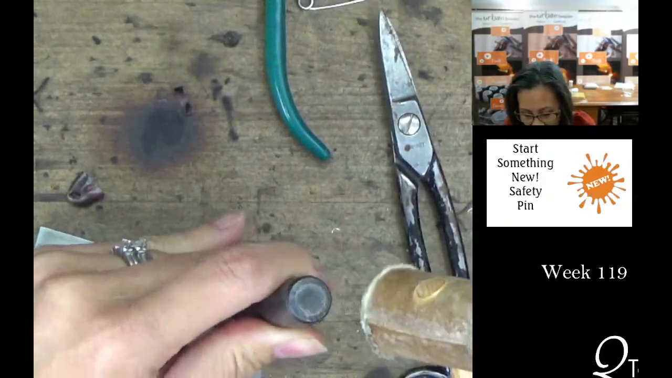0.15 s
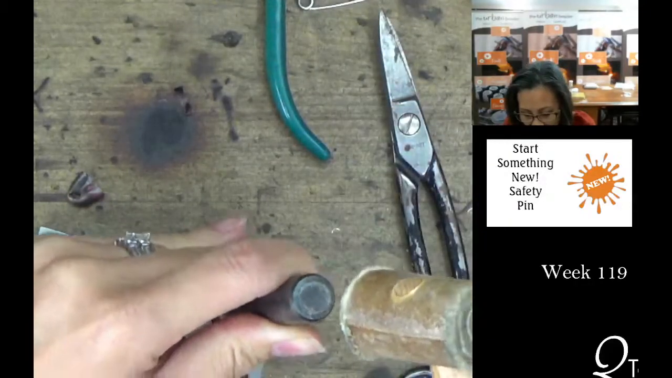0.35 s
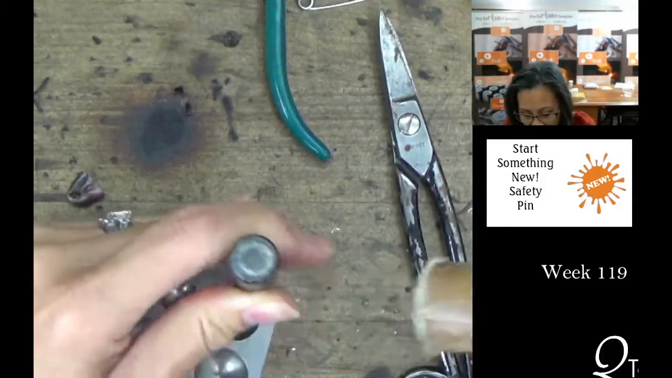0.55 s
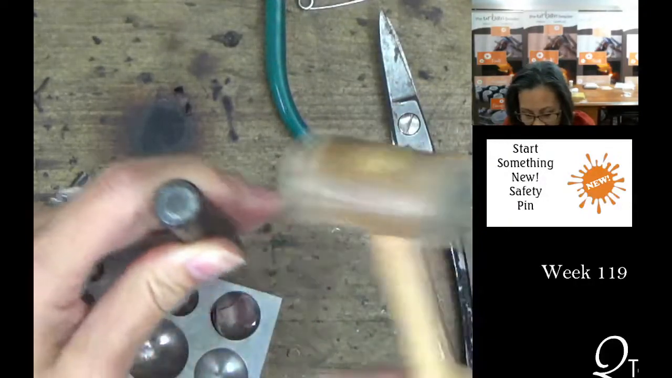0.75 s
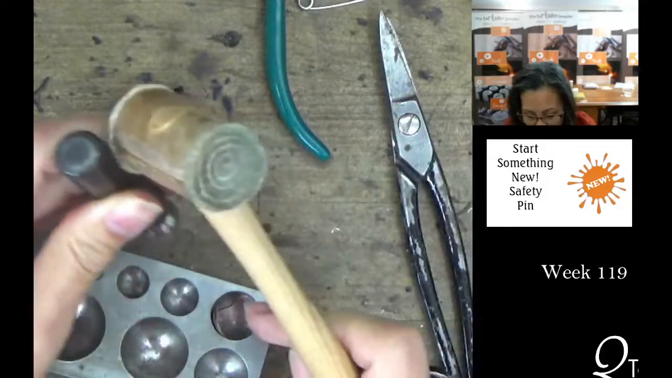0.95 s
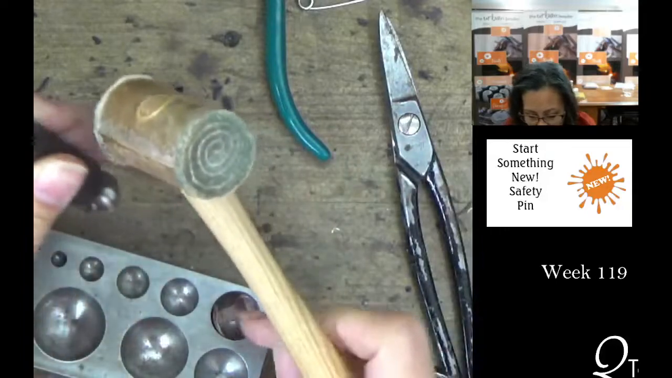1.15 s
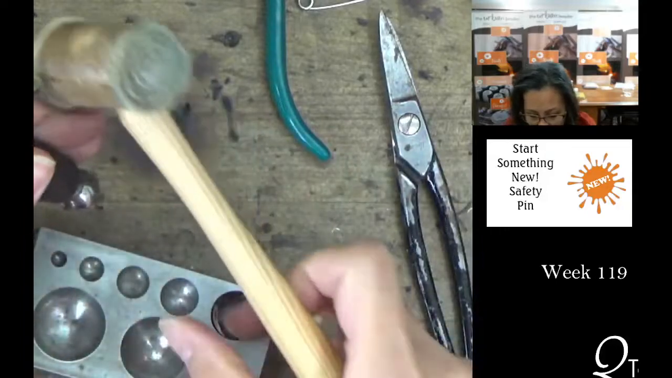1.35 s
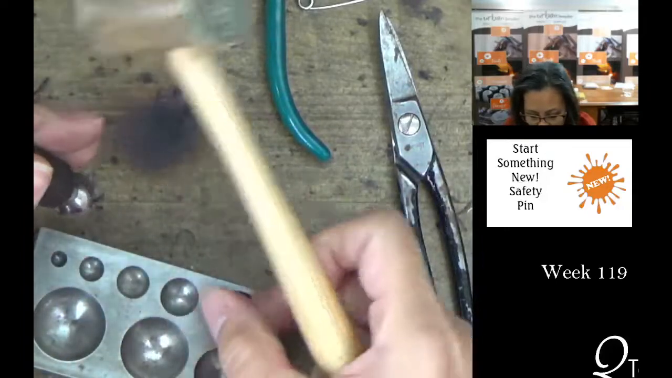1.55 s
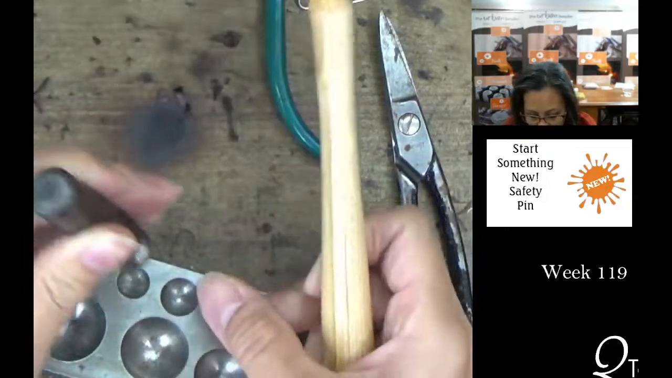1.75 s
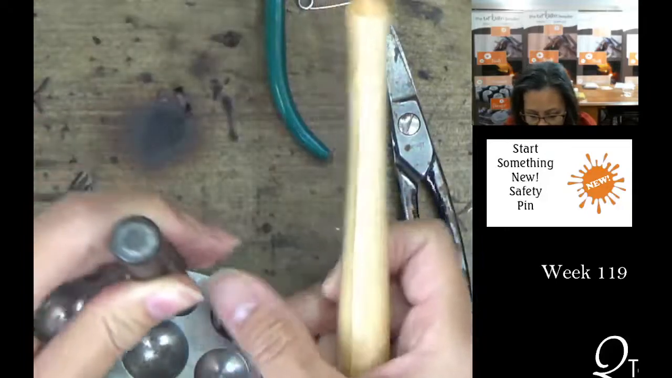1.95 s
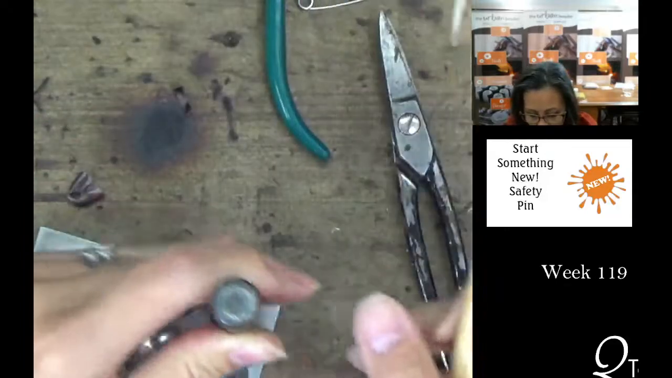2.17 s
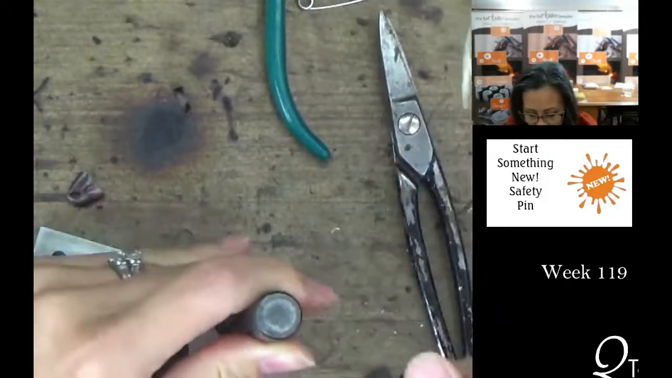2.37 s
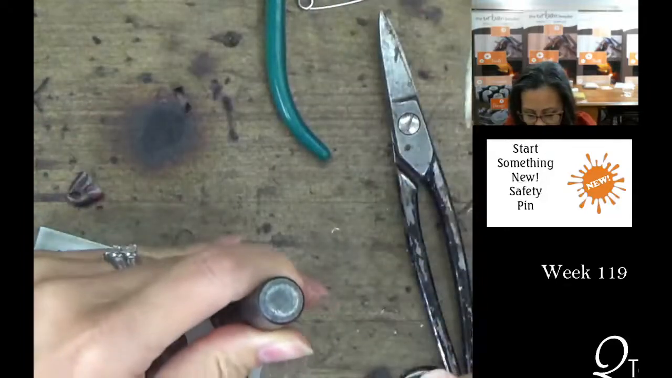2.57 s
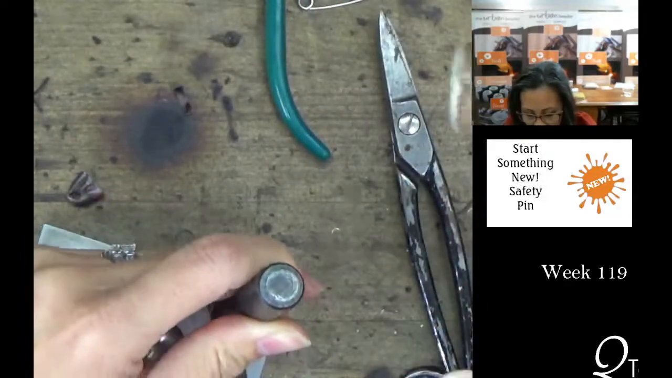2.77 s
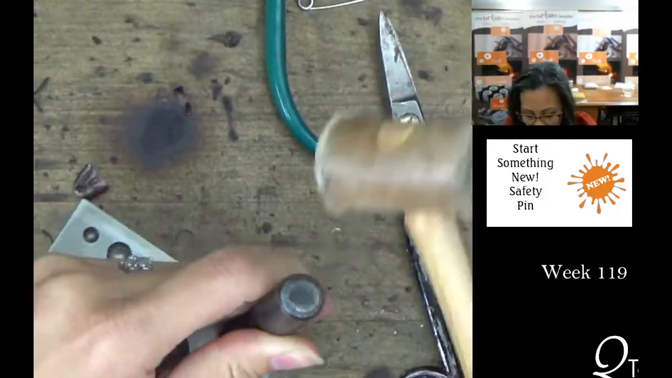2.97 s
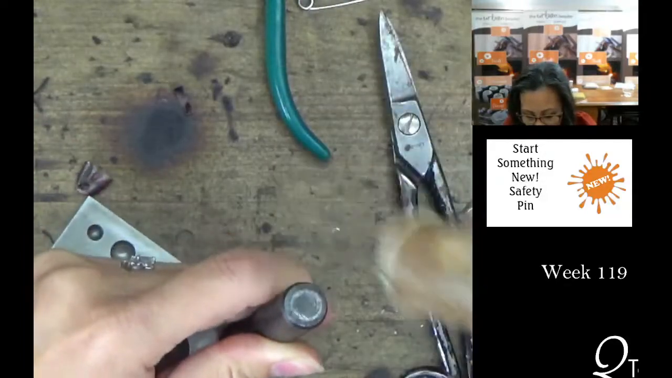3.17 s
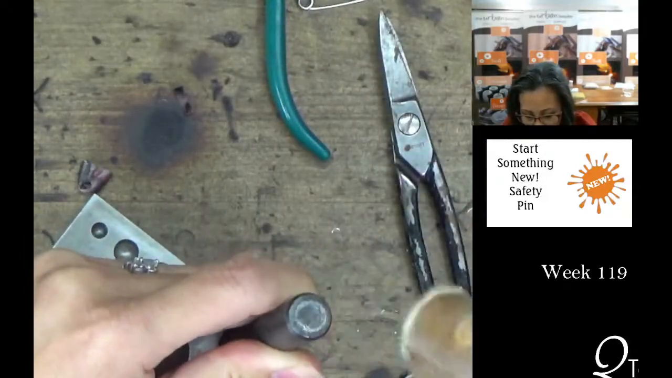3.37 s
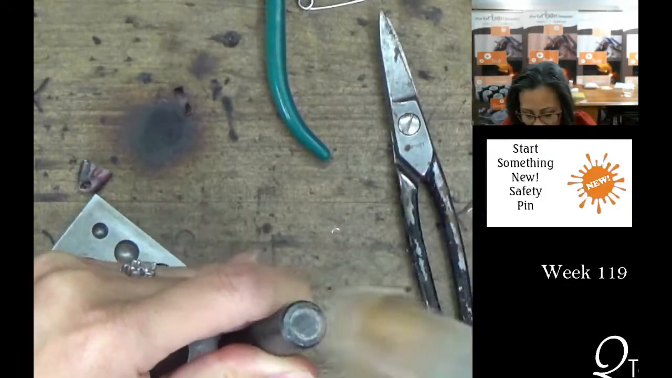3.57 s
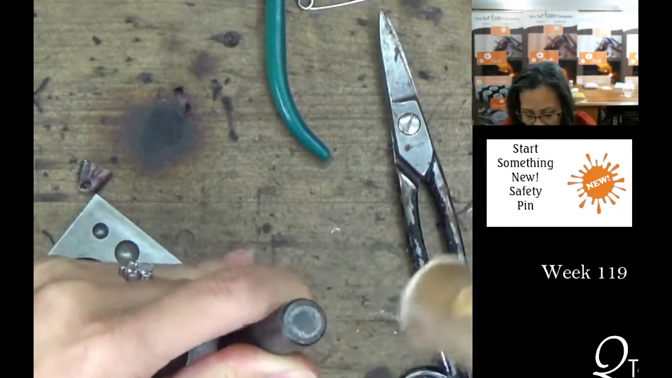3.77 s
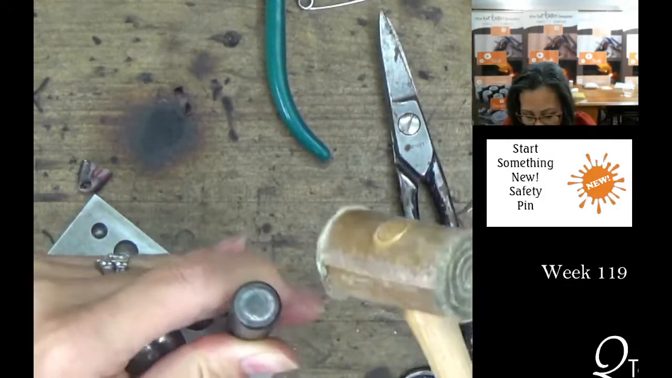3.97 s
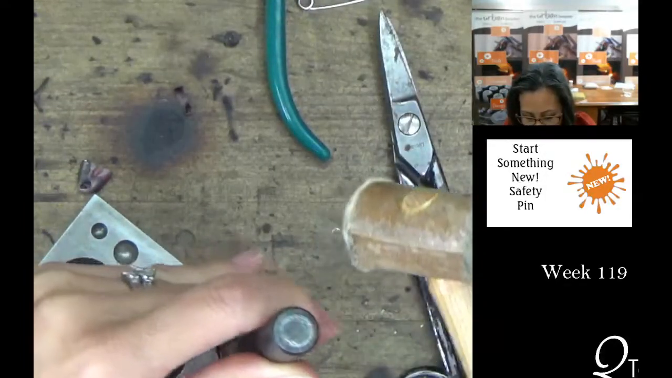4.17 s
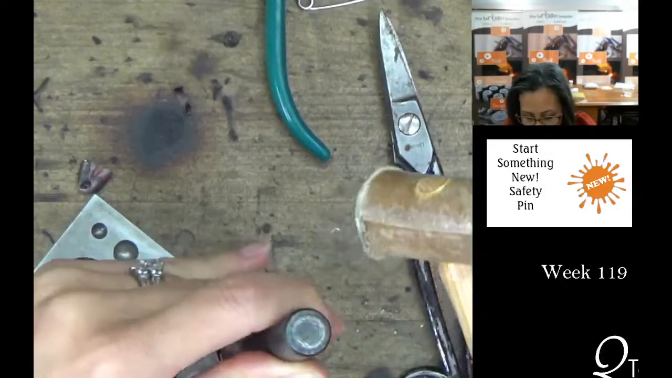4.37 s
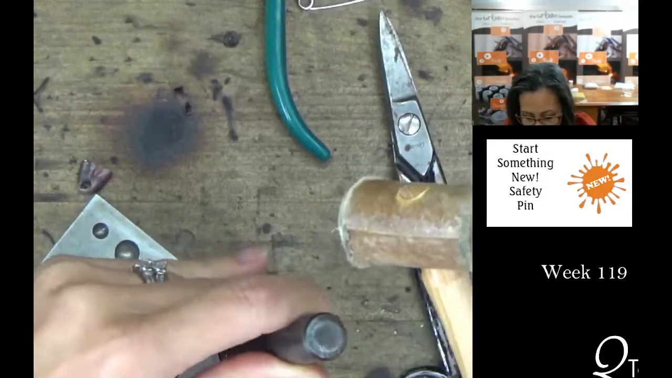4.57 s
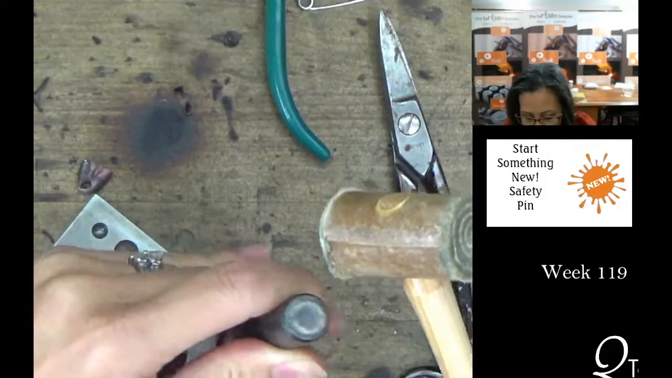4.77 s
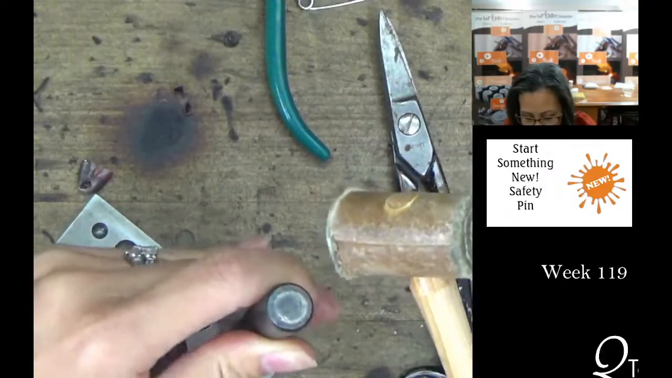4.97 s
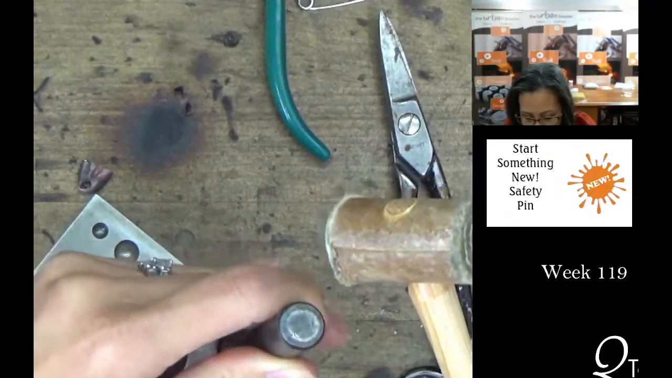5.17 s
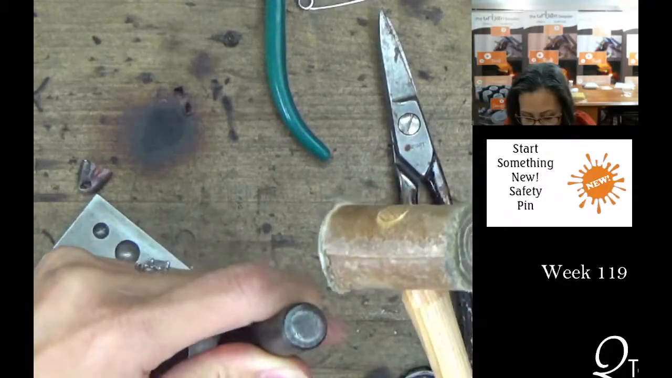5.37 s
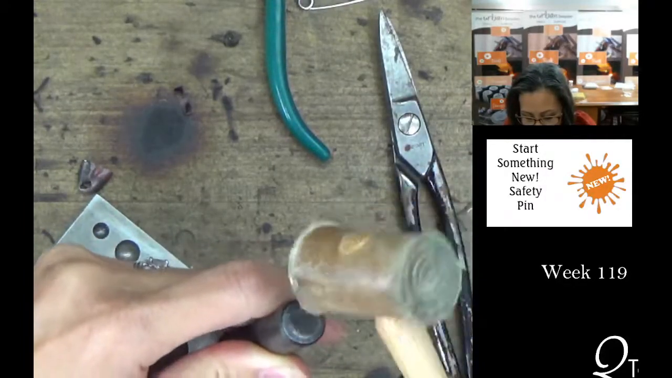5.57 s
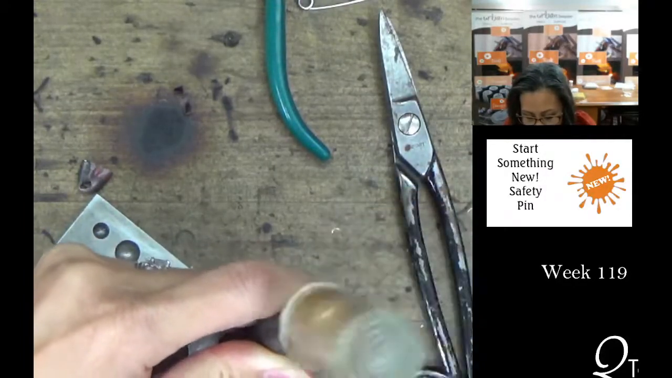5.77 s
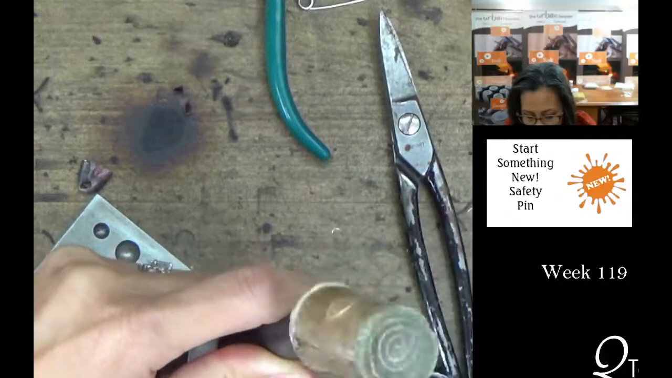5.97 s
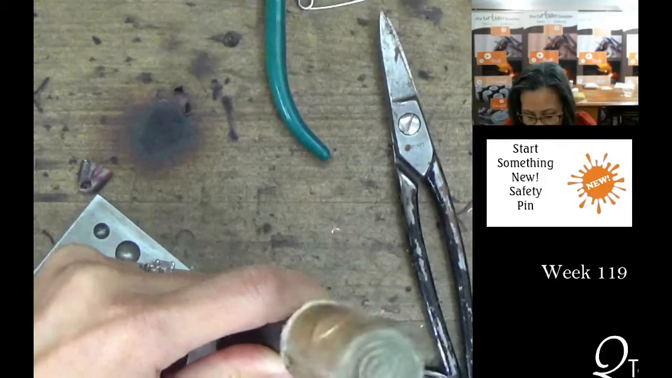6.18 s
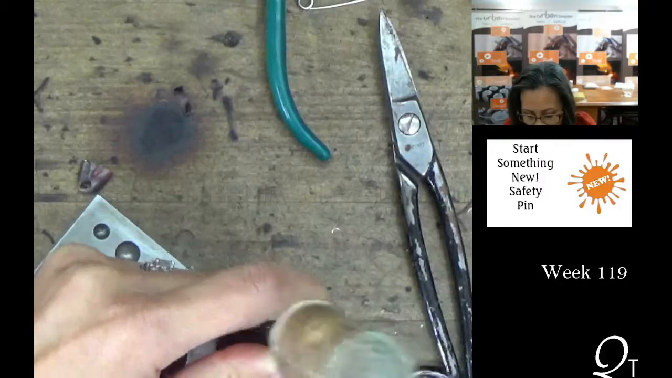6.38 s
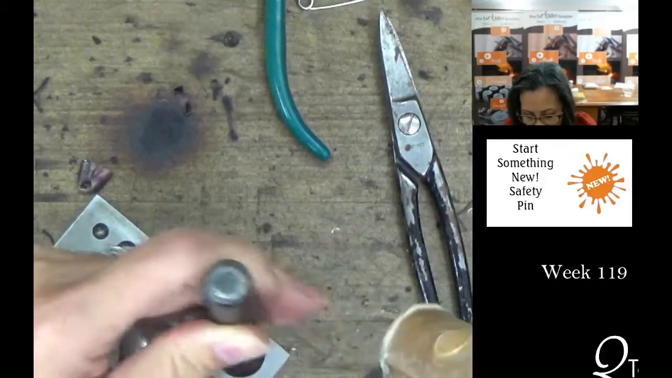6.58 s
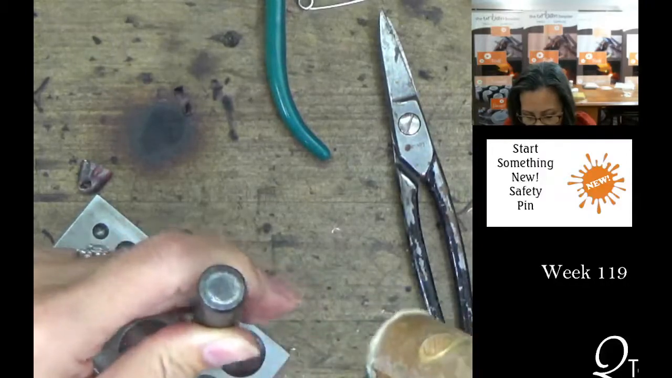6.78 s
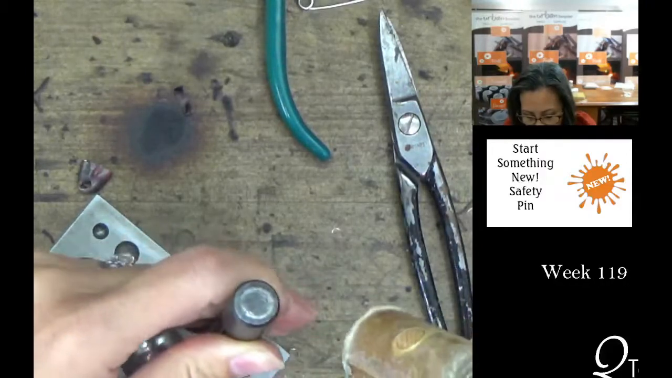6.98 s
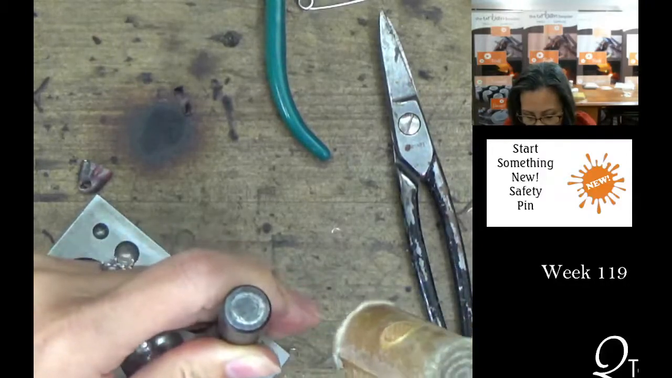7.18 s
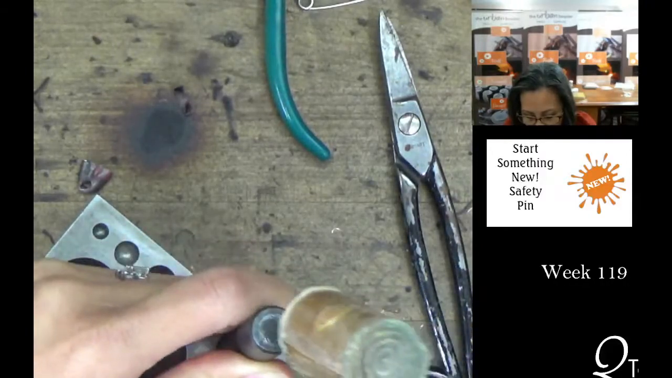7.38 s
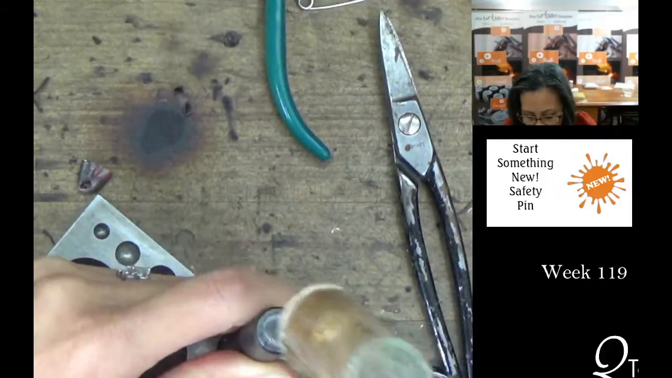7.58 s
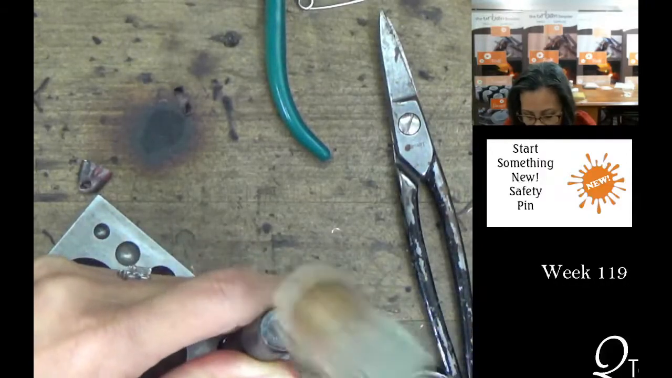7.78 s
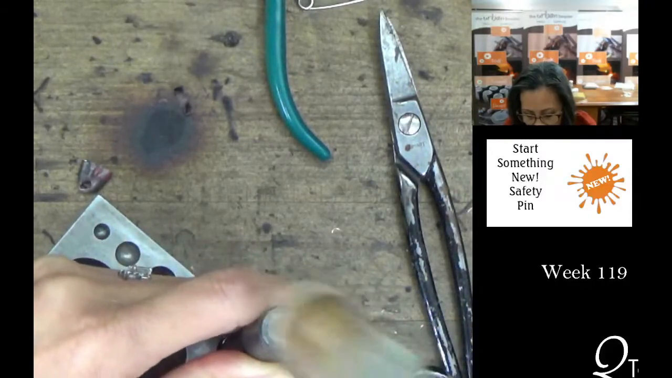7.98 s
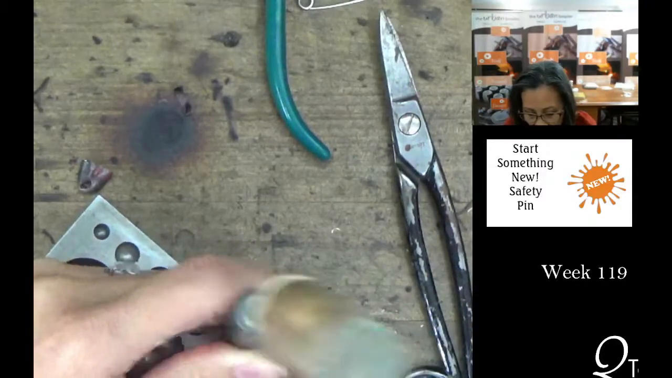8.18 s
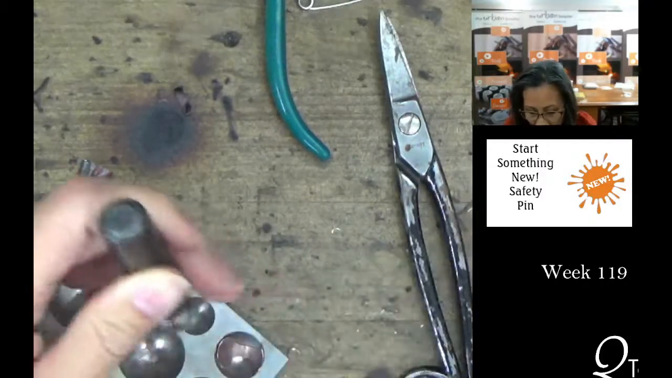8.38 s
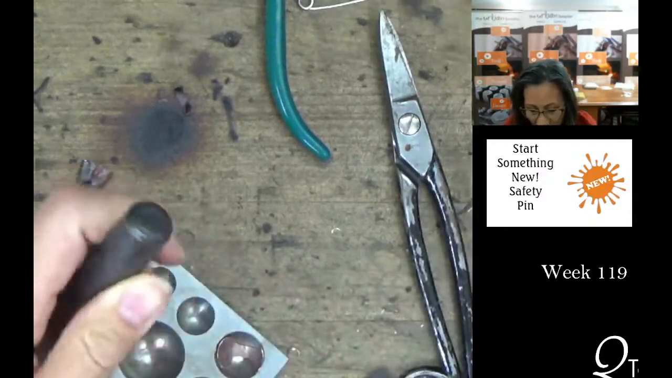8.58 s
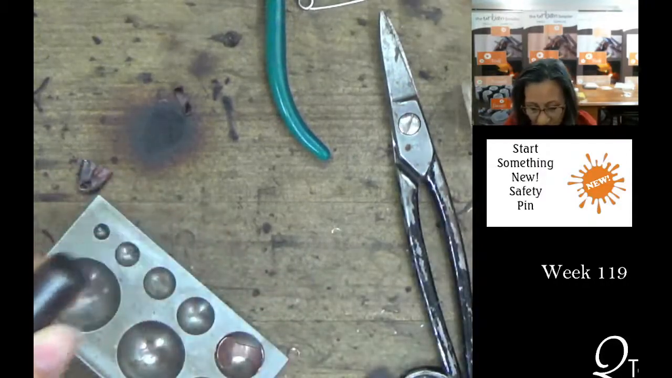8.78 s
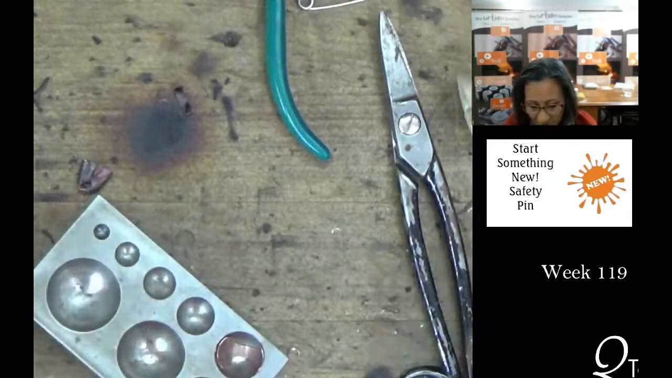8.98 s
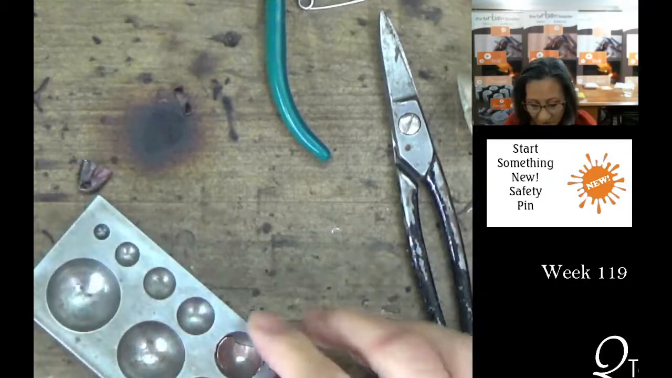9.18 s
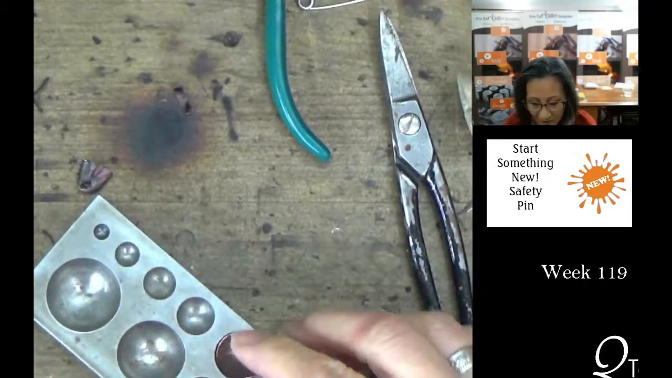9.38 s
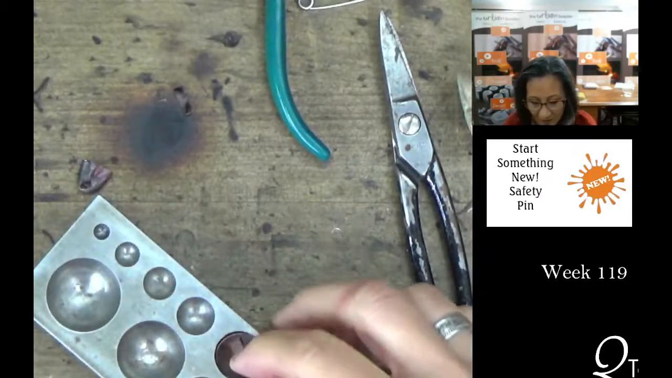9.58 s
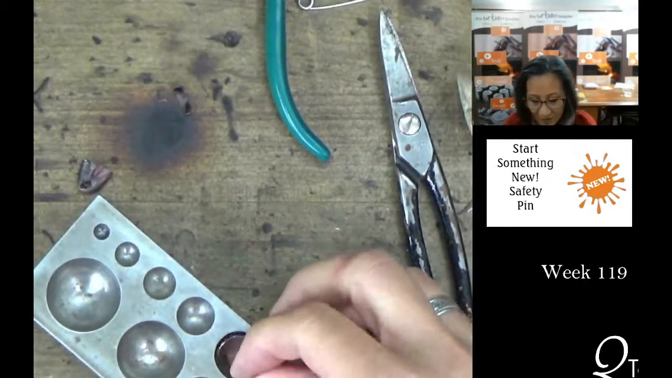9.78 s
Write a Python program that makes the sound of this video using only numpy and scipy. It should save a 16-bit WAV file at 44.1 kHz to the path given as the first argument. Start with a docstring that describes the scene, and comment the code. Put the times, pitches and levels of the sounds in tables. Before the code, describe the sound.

Close by at a wooden bench in a small room, a rawhide mallet hits a steel punch in a metal block: three growing blows, then four, then three slanted ones with a thin steel ring. Soft thuds, tiny disc ticks and brief rubs fill the gaps. Punch and mallet are then set down with woody clacks. Faint mains buzz and room noise run throughout.

```python
"""A rawhide mallet drives a steel dapping punch into a doming block: three quick groups of modal, crushed
blows. Place: a metal bench in a small room; its modes, dense short modes and reverberation answer every
contact. Between groups, soft reseating knocks, thin steel rings, disc ticks and rubs; then punch and mallet are
laid down. Behind them, loose tools sing on as narrow bands, over coloured room noise and a faint harmonic mains
buzz. Microphone: close by, thin in the deep bass, its input clipping on the hardest blows."""
import sys
import numpy as np
from scipy import signal
from scipy.fft import rfft, irfft
from scipy.io import wavfile

SR = 44100
rng = np.random.default_rng(int(sys.argv[2]) if len(sys.argv) > 2 else 0)


def dump_mix(stems):
    """Bounce the given channels to the path in sys.argv[1] as a 16-bit WAV at rate SR."""
    frames = np.atleast_2d(stems).T  # one column per channel
    limited = np.clip(frames, -1, 1)  # hard clip at full scale
    pcm = np.round(limited * 32767).astype(np.int16)
    wavfile.write(sys.argv[1], SR, pcm)


N = 433944
RESPONSE_S = 0.7  # length of each struck response


def from_db(db):
    """Decibels to amplitude gain."""
    return 10 ** (np.asarray(db) / 20)


def rms_one(x):
    """Scale to rms 1."""
    return x / np.sqrt(np.mean(x ** 2) + 1e-20)


def at_hz(points, hz):
    """Read a curve on a log-frequency axis."""
    f, value = np.transpose(points)
    return np.interp(np.log(hz), np.log(f), value)


def seconds(length):
    """A time axis [s]."""
    return np.arange(int(length * SR)) / SR


def add(out, s, sound):
    """Mix a sound in at time s."""
    i = max(0, int(s * SR))
    out[i:i + len(sound)] += sound[:N - i]


def cut(x, hz, kind):
    """Second-order Butterworth filter."""
    return signal.sosfilt(signal.butter(2, hz, kind, fs=SR, output="sos"), x)


def noise(spectrum, size):
    """Steady noise of a given colour, rms 1."""
    hz = np.maximum(np.fft.rfftfreq(size, 1 / SR), 1)
    white = rfft(rng.standard_normal(size))
    return rms_one(irfft(white * from_db(at_hz(spectrum, hz)), size))


def dying(t, t60):
    """Exponential decay, down 60 dB after t60 seconds."""
    return np.exp(-np.log(1000) * t / t60)


def ring(modes, t):
    """Struck modes as decaying sines; neighbours start in opposite directions."""
    out = np.zeros(len(t))
    for k, (hz, db, t60) in enumerate(modes):
        out += (-1) ** k * from_db(db) * dying(t, t60) * np.sin(2 * np.pi * hz * t)
    return out


def waver(size, hz, depth):
    """A gain that wanders round 1, as reflections meet and cancel."""
    return 1 + depth * rms_one(cut(rng.standard_normal(size), hz, "low"))


# colour of the room noise: (frequency [Hz], relative level [dB per Hz])
AIR_COLOUR = [(20, 5), (60, 1.5), (110, -1.5), (170, -8.5), (240, -3), (320, -2), (420, -7.5), (600, -18),
              (1200, -19), (2500, -25), (6000, -29.5), (10000, -33), (16000, -42)]
# envelope of the mains harmonics, before the spikes pair up: (frequency [Hz], level [dB rms])
BUZZ_ENVELOPE = [(120, -83), (600, -88.5), (950, -84.5), (1200, -80.5), (1900, -87.5), (2350, -89.5),
                 (2650, -82), (3300, -86.5), (3800, -87.5), (5000, -93.5), (5800, -92.5), (8000, -97),
                 (11000, -113)]
# low hum, set on the nearest mains harmonics: (frequency [Hz], level [dB rms])
HUM_LINES = [(60, -67), (240, -74), (300, -68.5)]
# strongest mains whine, set on the nearest harmonics: (frequency [Hz], level [dB rms])
WHINE_LINES = [(1200, -71), (1981, -77.5), (2519, -78), (2638, -79.5), (2762, -80), (2880, -82),
               (3182, -82), (3300, -83.5), (3418, -81), (3779, -83), (4258, -83.5), (5701, -84.5)]
MAINS_HZ = 59.975
SPIKE_GAP_S, SECOND_SPIKE_SHARE = 0.002105, 0.55  # a weaker second spike follows the first


def background():
    """Room noise, hum and whine lines, and mains buzz whose harmonics come from a spike pair in every cycle."""
    harmonics = MAINS_HZ * np.arange(1, 190)
    pair = 1 + SECOND_SPIKE_SHARE * np.exp(-2j * np.pi * harmonics * SPIKE_GAP_S)
    uneven_db = 1.5 * rng.standard_normal(len(harmonics))
    lines = pair * from_db(at_hz(BUZZ_ENVELOPE, harmonics) + uneven_db)
    for hz, db in HUM_LINES + WHINE_LINES:
        lines[round(hz / MAINS_HZ) - 1] = from_db(db)
    lines = lines * np.exp(1j * 1.3 * rng.standard_normal(len(harmonics)))  # scattered phases [rad]
    cycle = irfft(np.r_[0, lines], 4096) * 4096 / np.sqrt(2)  # line levels become rms
    cycles_passed = np.arange(N) / SR * MAINS_HZ
    buzz = np.interp(cycles_passed, np.arange(len(cycle)) / len(cycle), cycle, period=1)
    return from_db(-60.5) * noise(AIR_COLOUR, N) + buzz


SLANT_FROM_S = 7.5  # the last group of blows comes at a slant
# for their force, slanting blows shake the bench less and slow nudges more
SLANT_SHAKE_DB, NUDGE_SHAKE_DB = -3, 5.5


def shaking(t60):
    """How strongly the bench still trembles; the energy of successive blows and nudges adds up."""
    shaken = np.zeros(N)
    for s, force_db, _ in BLOWS:
        shaken[int(s * SR)] += from_db(force_db + SLANT_SHAKE_DB * (s >= SLANT_FROM_S)) ** 2
    for s, force_db, _ in NUDGES:
        shaken[max(0, int(s * SR))] += from_db(force_db + NUDGE_SHAKE_DB) ** 2
    energy = signal.fftconvolve(shaken, dying(seconds(1.7), t60) ** 2)[:N]
    return np.sqrt(np.abs(energy))


# close pair of long-ringing modes that beat: (frequency [Hz], level against the shaking [dB])
DRONE_PAIR = [(297, -31), (304, -40.5)]
DRONE_T60 = 2.9  # s
# loose tools: (frequency [Hz], width [Hz], level against the shaking [dB], t60 [s])
LOOSE_TOOL_BANDS = [(365, 70, -44, 2.8), (710, 90, -45, 2.4), (830, 70, -44.5, 1.9), (1600, 70, -46.5, 1.7),
                    (1750, 94, -44, 1.3), (2100, 40, -50.5, 1.3)]


def loose_tools():
    """Steel tools on the shaken bench sing on: one beating low tone, and unsteady narrow bands above it."""
    t = np.arange(N) / SR
    beating = sum(from_db(db) * np.sin(2 * np.pi * hz * t) for hz, db in DRONE_PAIR)
    out = shaking(DRONE_T60) * beating
    for hz, width, db, t60 in LOOSE_TOOL_BANDS:
        peak = signal.iirpeak(hz, hz / width, fs=SR)
        once = signal.lfilter(*peak, rng.standard_normal(N))
        tone = rms_one(signal.lfilter(*peak, once))
        out += from_db(db) * shaking(t60) * tone
    return out


# skin or steel sliding over the block: (time [s], length [s], level [dB])
RUBS = [(4.158, 0.13, -40), (4.417, 0.055, -44), (5.189, 0.1, -43), (7.228, 0.1, -44.5),
        (8.458, 0.078, -47)]


def rubs():
    """Skin or steel slides briefly over the block, as coloured friction noise."""
    out = np.zeros(N)
    colour = [(200, -32), (700, 2.5), (1500, -4.5), (3500, -5.0), (7000, -11.5), (14000, -34)]  # Hz, dB
    for s, length, level_db in RUBS:
        t = seconds(length)
        stroke = (1 - np.exp(-t / 0.0052)) * (1 - t / length) ** 2 / 2  # grips at once, then slows
        add(out, s, from_db(level_db) * stroke * noise(colour, len(t)))
    return out


# resonances of the dragged punch: (frequency [Hz], width [Hz], relative level [dB])
SQUEAK_BANDS = [(1398, 83, 9.5), (2450, 200, 1), (3450, 100, 3.5), (5500, 120, -1)]


def squeak(start, length, level_db):
    """The punch dragged out of its hollow squeaks: friction feeds a few of its resonances."""
    out, t = np.zeros(N), seconds(length)
    friction = rng.standard_normal(len(t))
    tones = np.zeros(len(t))
    for hz, width, db in SQUEAK_BANDS:
        peak = signal.iirpeak(hz, hz / width, fs=SR)
        tones += from_db(db) * rms_one(signal.lfilter(*peak, friction))
    add(out, start, from_db(level_db) * np.sin(np.pi * t / length) ** 2 * tones)
    return out


# the metal disc in its hollow: (time [s], level [dB], level of its body below the top band [dB])
TICKS = [(0.0662, -32.5, 0.5), (1.3194, -50, -8), (1.812, -36.5, -4.5), (2.5294, -48, -6),
         (2.828, -38.5, -8.5), (3.8453, -43, -2), (3.8785, -46, 0), (4.439, -32, 4), (4.6369, -43, 10),
         (4.6794, -40, 0), (5.226, -23, -15), (6.7521, -47, -1), (7.2705, -34.5, -5), (8.114, -32.5, -0.5),
         (8.4636, -52, -2), (9.245, -48, -9)]
# modes of the disc, before each touch varies them: (frequency [Hz], relative level [dB], t60 [s])
DISC_MODES = [(7160, -7, 0.021), (8120, -1.5, 0.11), (10830, -11, 0.099), (13500, 2, .06),
              (14000, -5, 0.12), (14800, -16, 0.074), (15900, 7, .08)]
DISC_BODY_BELOW_HZ = 12000


def disc():
    """Tiny bright clicks with a short ring and a trace of room; each touch favours other modes."""
    out, t = np.zeros(N), seconds(0.3)
    colour = [(500, -34), (3000, -33), (6000, -3), (9000, 3.5), (12000, -4.0), (14800, -10), (16000, 1.0)]
    click_decay = from_db(-13) * dying(t, 0.053) + from_db(-17) * dying(t, 0.23)
    for s, level_db, body_db in TICKS:
        detune = 1 + 0.012 * rng.standard_normal(len(DISC_MODES))
        modes = [(hz * shift, db + 3 * rng.normal(), t60)
                 for (hz, db, t60), shift in zip(DISC_MODES, detune)]
        tick = from_db(-15) * ring(modes, t) + noise(colour, len(t)) * click_decay
        body, top = (cut(cut(tick, DISC_BODY_BELOW_HZ, kind), DISC_BODY_BELOW_HZ, kind)
                     for kind in ("low", "high"))
        add(out, s, from_db(level_db) * (top + from_db(body_db) * body))
    return out


# steel of punch and block: (time [s], level of middle mode [dB], rise from one mode to the next [dB])
RINGS = [(0.003, -46, 4), (2.446, -60.5, 0), (3.738, -57.5, -17), (4.31, -52, -1), (4.635, -45.5, -14.5),
         (5.086, -47, 2), (5.232, -55, 3), (5.88, -49, 3.5), (6.223, -27.5, 6), (6.829, -47.5, -9),
         (7.801, -56.5, -9.5), (7.990, -44.5, 12), (9.481, -70.5, -23)]
# steel modes, lowest first: (frequency [Hz], t60 [s])
STEEL_MODES = [(9324, 0.14), (10583, 0.31), (11147, 0.22)]


def steel():
    """Steel rings thinly in a loose grip, leaning to its low or top mode; the room makes it waver."""
    out, t = np.zeros(N), seconds(RESPONSE_S)
    for s, level_db, brightness_db in RINGS:
        for step, (hz, t60) in enumerate(STEEL_MODES, -1):
            tone = ring([(hz, level_db + step * brightness_db, t60)], t)
            add(out, s, waver(len(t), hz=44.36, depth=0.32) * tone)
    return out


# the block rocks on the bench: (time [s], level [dB])
ROCKING = [(0.003, -32.5), (2.447, -32.5)]
ROCKING_HZ, ROCKING_T60 = 412, 0.37  # Hz, s


def rocking():
    """The heavy block rocks on the bench top with one hollow, decaying low tone."""
    out = np.zeros(N)
    for s, db in ROCKING:
        add(out, s, ring([(ROCKING_HZ, db, ROCKING_T60)], seconds(RESPONSE_S)))
    return out


# modes of the loaded bench: (frequency [Hz], relative level [dB], t60 [s])
BENCH_MODES = [(77, -17.5, 0.21), (99, -22.5, 0.6), (127, -20.5, 0.24), (153, -20.5, 0.3),
               (205, -18.5, 0.11), (295.5, -7, 0.15), (341, -3, 0.051), (402, -5, 0.18), (429, -14, 0.085),
               (502, -14, 0.1), (614.4, -7.5, 0.12), (657, -12.5, 0.11), (700, -6.5, 0.089),
               (778, -7, 0.078), (857, -15.5, 0.042), (937, -16, 0.16), (1159, -19.5, 0.034),
               (1244, -14, 0.12), (1540, -16.5, 0.072), (1477, -17, 0.12), (1710, -16.5, 0.035),
               (2060, -12.5, 0.1), (2240, -10.5, 0.0087), (3850, -13, 0.025)]
# first snap of a contact: (frequency [Hz], relative level [dB], t60 [s])
SNAP_MODES = [(2486, 1, 0.0059), (1335, -8.5, 0.0061), (4280, -12, 0.014), (8000, -12, 0.0059)]
# decay of the room: (frequency [Hz], t60 [s])
ROOM_T60 = [(60, 0.27), (150, .32), (400, 0.36), (1500, 0.25), (4000, .29), (8000, 0.16), (16000, 0.19)]
# strength of the reverberation: (frequency [Hz], relative level [dB])
ROOM_LEVEL = [(60, -5.5), (300, -2.5), (750, -8), (1400, -4), (2600, -6.5), (4200, -7.5), (7000, -5),
              (16000, -8.5)]


def bench_response(colour, modes_db, short_t60, room_db, snap_db):
    """One contact: the bench's main modes, dense short modes, the room behind them, and a first snap."""
    t = seconds(RESPONSE_S)
    dense, echoes = rfft(rng.standard_normal((2, len(t))))
    hz = np.maximum(np.fft.rfftfreq(len(t), 1 / SR), 1)
    out = from_db(modes_db) * ring(BENCH_MODES, t) * (1 - np.exp(-t / 0.00037))
    for centre in 31.25 * 2 ** (np.arange(28) / 3):
        third = np.maximum(0, 1 - 3 * abs(np.log2(hz / centre)))  # overlapping third-octave band
        swell = 1 - np.exp(-t * centre / 0.11)  # lows start later
        short_decay = dying(t, short_t60 * (1000 / centre) ** 0.05)  # lows last longer
        direct = irfft(dense * third, len(t)) * swell * short_decay
        room_shape = swell * dying(t, at_hz(ROOM_T60, centre)) * (1 - np.exp(-t / 0.019))
        room = irfft(echoes * third, len(t)) * room_shape
        level = from_db(at_hz(colour, centre)) * np.sqrt(centre / SR) / 4
        room_gain = from_db(room_db + at_hz(ROOM_LEVEL, centre))
        out += level * (rms_one(direct) + room_gain * rms_one(room))
    return out + from_db(snap_db) * ring(SNAP_MODES, t)


# borders between thud, knock, clack and crack: (frequency [Hz])
CROSSOVERS = [500, 1200, 4500]


def registers(response):
    """Split a response into thud, knock, clack and crack, each with rms 1 over its first 30 ms."""
    parts = []
    for hz in CROSSOVERS:
        parts.append(cut(cut(response, hz, "low"), hz, "low"))
        response = cut(cut(response, hz, "high"), hz, "high")
    parts = np.array(parts + [response])
    return parts / parts[:, :int(0.03 * SR)].std(axis=1, keepdims=True)


# a harder contact lifts the upper registers, share of hardness in: (thud, knock, clack, crack)
HARDNESS_SHARE = (0, .15, .85, 1)


def contacts(rows, balance_db, response, crush_db, crush_s):
    """Each contact is a push plus a brief crush of the surfaces; force and hardness weight the registers."""
    out, parts, t = np.zeros(N), registers(response), seconds(0.047)
    for s, force_db, hardness_db in rows:
        levels = force_db + np.array(balance_db) + hardness_db * np.array(HARDNESS_SHARE)
        # fresh noise: no two contacts have the same treble
        crush = cut(rng.standard_normal(len(t)) * np.exp(-t / crush_s), 900, "high")
        force = from_db(crush_db) * crush / np.linalg.norm(crush)
        force[0] += 1  # the push
        force /= np.linalg.norm(force)
        add(out, s, signal.fftconvolve(from_db(levels) @ parts, force))
    return out


# light hollow knocks on the bench: (time [s], force [dB], hardness [dB])
KNOCKS = [(0.748, -64.5, 17), (4.610, -32, 0), (6.373, -31, 1), (8.671, -38.5, -11), (9.689, -39, -12)]
# register balance of a knock: (thud [dB], knock [dB], clack [dB], crack [dB])
KNOCK_BALANCE = (-5.5, -0.5, -28.5, -34.5)


def knocks(response):
    """Light hollow contacts on the bench, with a long, weak crush."""
    return contacts(KNOCKS, KNOCK_BALANCE, response, crush_db=-13.5, crush_s=0.013)


# dense short modes under a tool: (frequency [Hz], relative level [dB per Hz])
TOOL_COLOUR = [(40, -35), (110, 3.5), (250, -2), (650, 2.5), (1400, 5.5), (2400, 6), (3600, -19.5),
               (6000, -28), (9000, -30.5), (16000, -54)]
# the steel punch drops on the bench and bounces: (time [s], force [dB], hardness [dB])
PUNCH_DOWN = [(8.770, -29, 1), (8.812, -35, -7)]
# its register balance: (thud [dB], knock [dB], clack [dB], crack [dB])
PUNCH_DOWN_BALANCE = (-5.5, 2, -10, 1.5)
# the mallet is laid down, head then handle: (time [s], force [dB], hardness [dB])
MALLET_DOWN = [(9.478, -29.5, 4), (9.486, -27.5, 0.5), (9.499, -30.5, -2), (9.520, -32.5, -3)]
# its register balance: (thud [dB], knock [dB], clack [dB], crack [dB])
MALLET_DOWN_BALANCE = (-4.5, 0.5, -10.5, -39)


def tools_down():
    """Punch and mallet strike the bench as they are laid down; the punch cracks, the mallet does not."""
    clack = bench_response(TOOL_COLOUR, modes_db=0.0, short_t60=0.034, room_db=-2.0, snap_db=-27)
    punch = contacts(PUNCH_DOWN, PUNCH_DOWN_BALANCE, clack, crush_db=1.5, crush_s=0.0028)
    mallet_laid = contacts(MALLET_DOWN, MALLET_DOWN_BALANCE, clack, crush_db=1.5, crush_s=0.005)
    return punch + mallet_laid


# the punch is seated in its hollow: (time [s], force [dB], hardness [dB])
NUDGES = [(0.003, -32.5, 2), (0.094, -40.5, -23), (2.446, -36, 4.5), (2.684, -53.5, -11), (2.765, -51, -19),
          (3.738, -39, 0), (4.309, -33.5, 1), (4.408, -43.5, 1.5), (4.449, -32, -30), (4.635, -59.5, 24),
          (5.081, -32, -1), (5.228, -30, -17), (6.826, -31, 4.5), (7.244, -49.5, 9), (7.261, -44.5, -2),
          (7.412, -43.5, -28)]
# register balance of a nudge: (thud [dB], knock [dB], clack [dB], crack [dB])
NUDGE_BALANCE = (0.5, -11, -18.5, -28)


def nudges(response):
    """Soft knocks of the punch being reseated, mostly thud."""
    return contacts(NUDGES, NUDGE_BALANCE, response, crush_db=-8, crush_s=0.0024)


# dense short modes under a nudge or knock: (frequency [Hz], relative level [dB per Hz])
NUDGE_COLOUR = [(40, -19), (100, 1), (210, -1.5), (380, 1.5), (700, -1.5), (1100, -16.5), (2600, -4),
                (4000, -0.5), (6000, -11), (9000, -17), (16000, -26)]


def soft_contacts():
    """Reseating nudges and light knocks excite the same soft bench response."""
    soft = bench_response(NUDGE_COLOUR, modes_db=3.0, short_t60=0.06, room_db=2.5, snap_db=-9)
    return nudges(soft) + knocks(soft)


# the block sits loosely under the first hard blows: (time [s], level [dB])
PINGS = [(3.348, -14.5), (3.5272, -23)]
# modes of that ping: (frequency [Hz], relative level [dB], t60 [s])
PING_MODES = [(4070, 0, .06), (4180, -6, 0.13), (7200, -10, 0.068)]


def pings():
    """A short steel ping of the loose block on top of the blow, wavering in the room."""
    out, t = np.zeros(N), seconds(RESPONSE_S)
    for s, db in PINGS:
        add(out, s, from_db(db) * waver(len(t), hz=120, depth=0.6) * ring(PING_MODES, t))
    return out


# mallet on punch: (time [s], force [dB], hardness [dB])
BLOWS = [(3.2022, -25.5, -4), (3.3490, -14.5, 3), (3.5274, -11, -1), (5.6983, -16, 1.5),
         (5.8781, -13.5, -.5), (6.0502, -12, -1.5), (6.2236, -10.5, 1), (7.6016, -17.5, 0.5),
         (7.8018, -14, -1), (7.9895, -11.5, -0.5)]
# dense short modes under a blow: (frequency [Hz], relative level [dB per Hz])
BLOW_COLOUR = [(40, -18), (100, -5), (210, -14.5), (380, -6), (700, -1.5), (1000, -10), (1500, -5),
               (2600, -4.5), (3300, -9.5), (4200, -8), (5200, -22.5), (7500, -13), (11000, -27.5),
               (16000, -25)]
# register balance of a square blow: (thud [dB], knock [dB], clack [dB], crack [dB])
SQUARE_BALANCE = (-1.5, 1.5, -3.5, -16.5)
# register balance of a slanting blow: (thud [dB], knock [dB], clack [dB], crack [dB])
SLANT_BALANCE = (0.5, 0.5, -5.5, -12)
SLANT_RING_DB = -14.5  # lowest steel mode against the force of a slanting blow


def mallet():
    """Square blows clack; slanting ones clack less, crack more and set the steel singing."""
    blow = bench_response(BLOW_COLOUR, modes_db=0, short_t60=0.047, room_db=-2.0, snap_db=7.0)
    square = [row for row in BLOWS if row[0] < SLANT_FROM_S]
    slanting = [row for row in BLOWS if row[0] >= SLANT_FROM_S]
    out = contacts(square, SQUARE_BALANCE, blow, crush_db=-2.5, crush_s=0.00082)
    out += contacts(slanting, SLANT_BALANCE, blow, crush_db=-3.5, crush_s=0.0011)
    (hz, t60), t = STEEL_MODES[0], seconds(RESPONSE_S)
    for s, force_db, _ in slanting:
        singing = ring([(hz, force_db + SLANT_RING_DB, t60)], t)
        add(out, s, waver(len(t), hz=43.9, depth=0.32) * singing)
    return out


def scene():
    """Everything on and around the bench reaches one close microphone, sent alike to both channels."""
    distant = background() + loose_tools()
    friction = rubs() + squeak(8.690, length=0.079, level_db=-54.5)
    metal = disc() + steel() + pings()
    handling = soft_contacts() + tools_down() + rocking()
    mono = distant + friction + metal + handling + mallet()
    return np.array([mono, mono])


CUTOFF_HZ = 15800


def record(dry):
    """The microphone loses the deep bass, the input overloads on the hardest blows, and the top is cut."""
    clipped = np.clip(cut(dry, 46, "high"), -0.9, 0.9)
    top_cut = signal.ellip(10, 0.1, 95, CUTOFF_HZ, fs=SR, output="sos")
    return signal.sosfilt(top_cut, clipped)


dry = scene()
out = record(dry)
dump_mix(out)
```